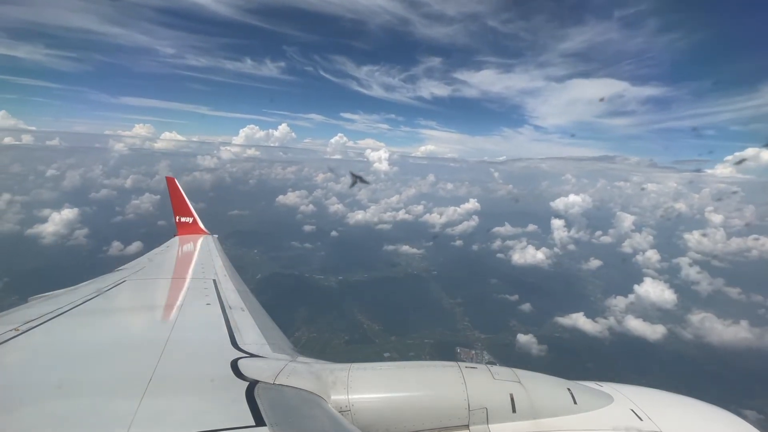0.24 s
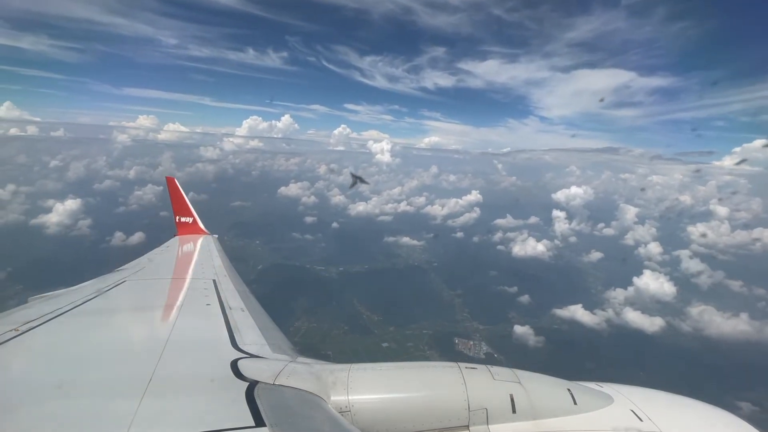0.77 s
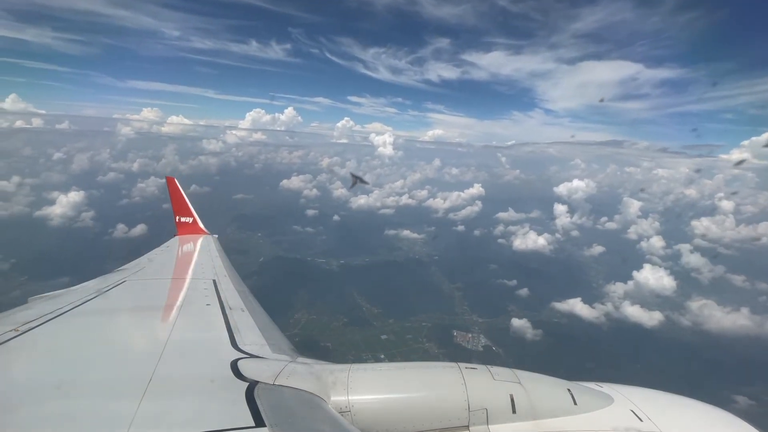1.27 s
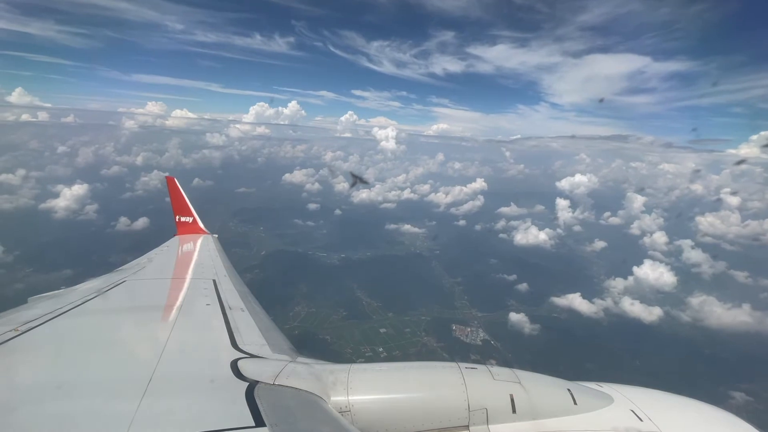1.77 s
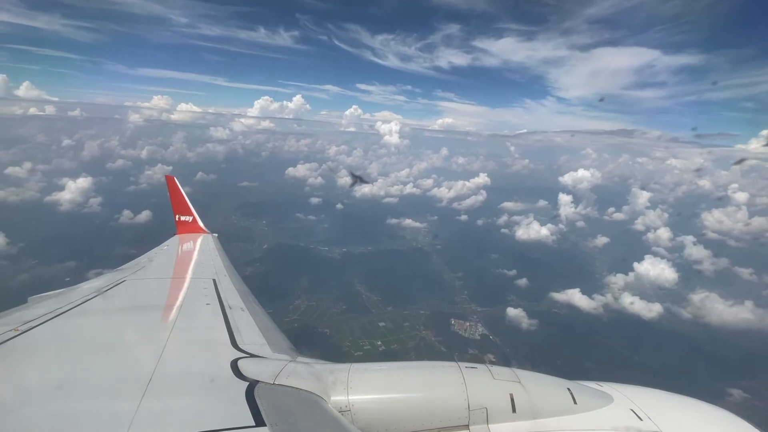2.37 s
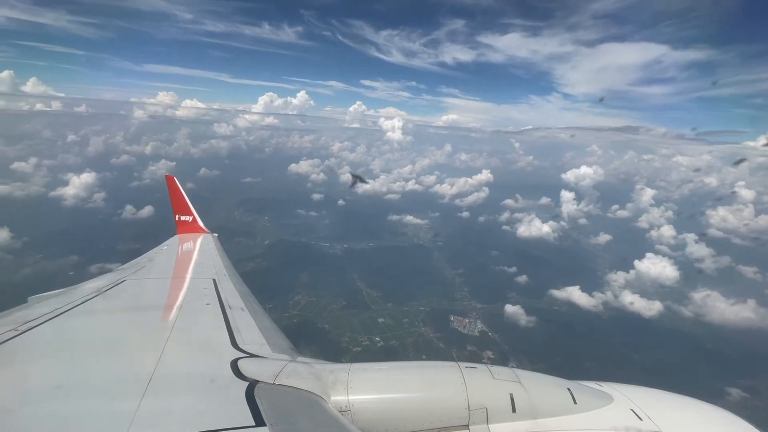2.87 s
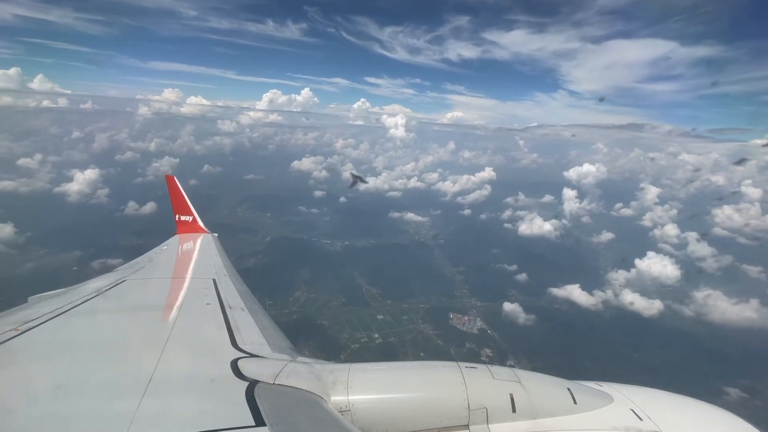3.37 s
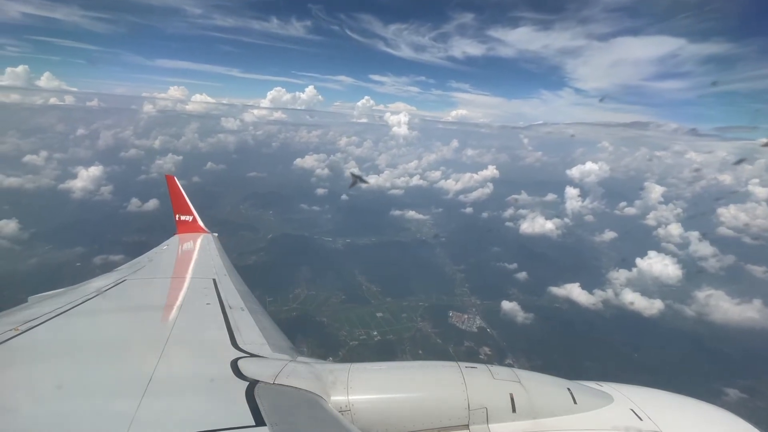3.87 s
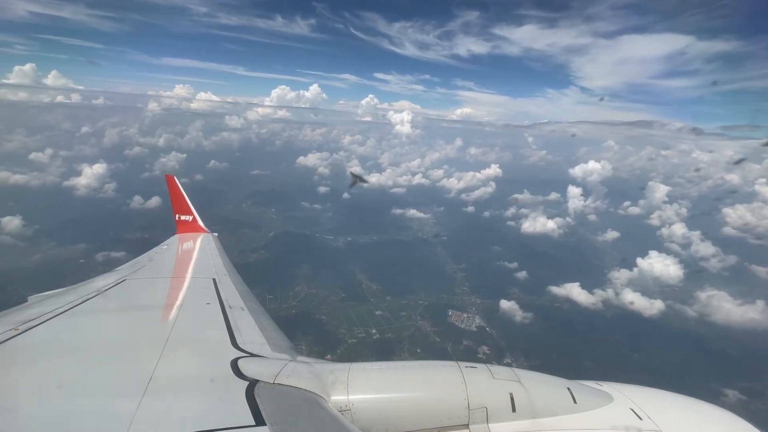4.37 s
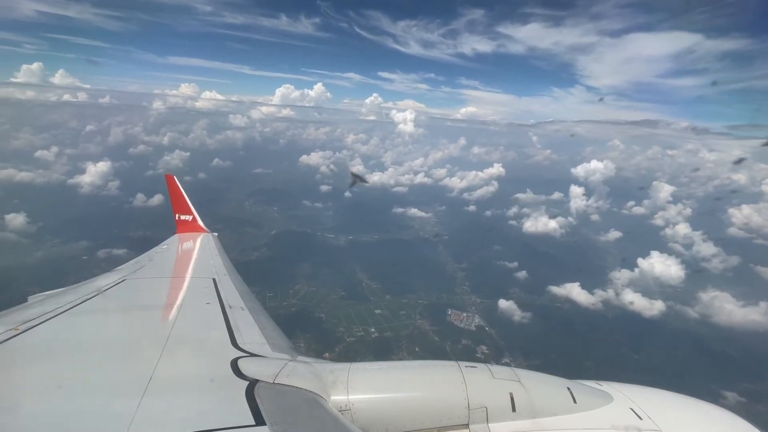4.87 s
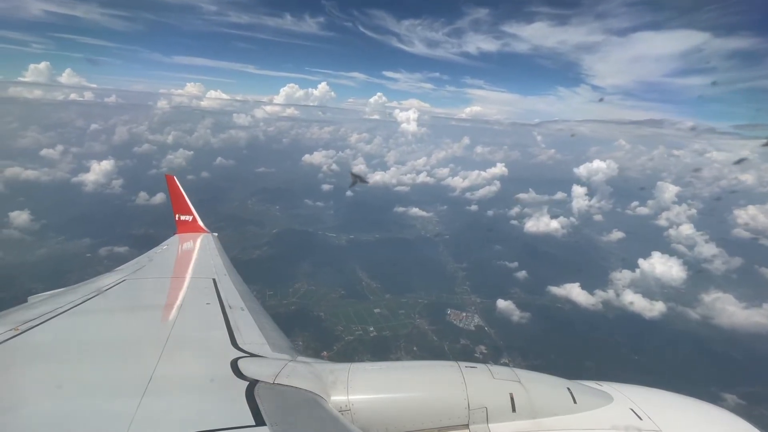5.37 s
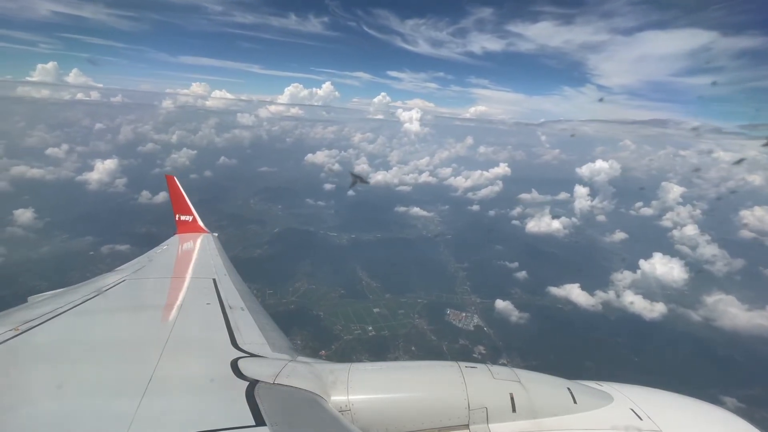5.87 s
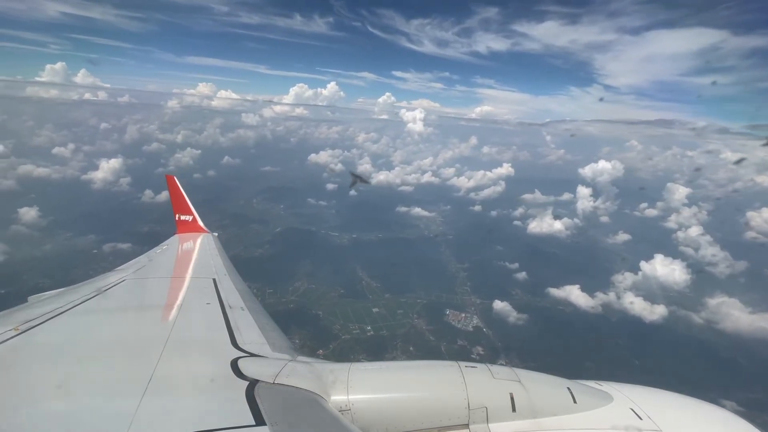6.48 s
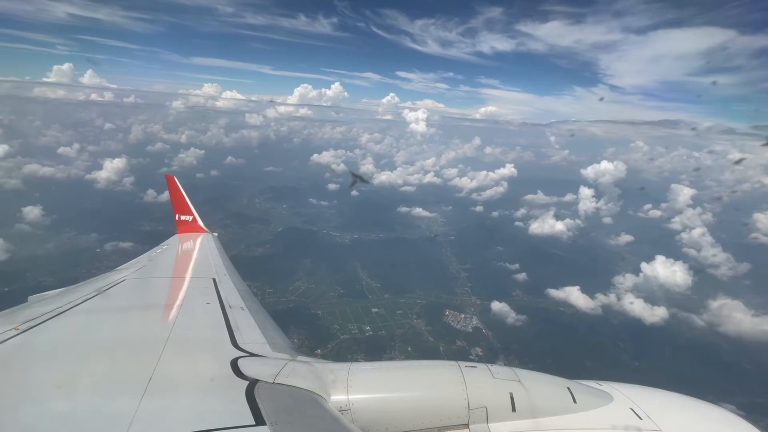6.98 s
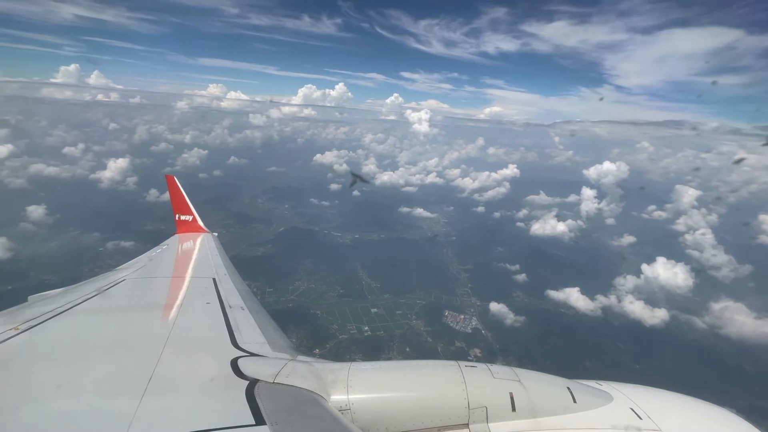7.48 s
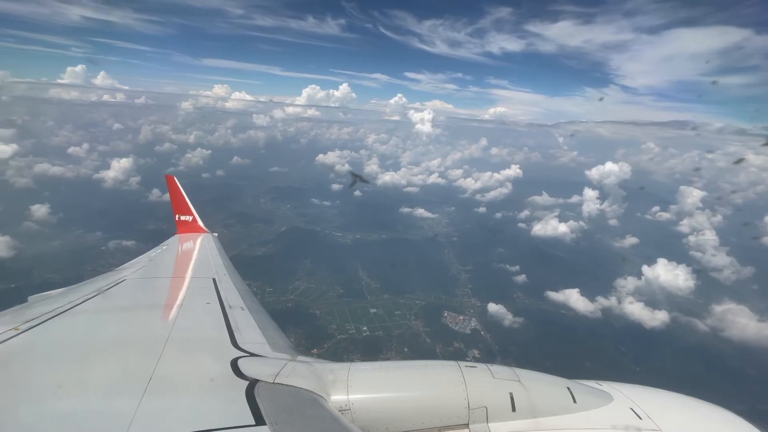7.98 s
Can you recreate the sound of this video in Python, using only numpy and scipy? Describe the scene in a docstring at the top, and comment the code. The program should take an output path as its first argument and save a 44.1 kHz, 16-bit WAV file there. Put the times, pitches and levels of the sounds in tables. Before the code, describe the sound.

From 0 to about 8 seconds, the uninterrupted interior noise of a jet airliner in cruise, heard at a window seat. A strong, deep hum near 80 Hz forms the base, joined by a thick, boomy roar concentrated around 100 to 300 Hz, as wall panels and cabin air resonate. Two close fan tones beat slowly: the hum is fuller at the start, thins around 3.9 seconds, then swells back towards the end. Above it, muffled rushing air extends through the mids with small, irregular turbulent flutters, falling away to a faint, dull hiss. A weak hydraulic pump whine near 550 Hz and its higher harmonics, plus very thin engine tones near 2 kHz, hover almost buried, nearly constant in pitch. Stereo is wide and enveloping, slightly different at each side, close and dense, with peaks gently held down. It begins and ends mid-drone, with no separate events.

```python
"""Window seat of an airliner in cruise: rushing air and jet roar shake the wall panels and the cabin air.
The roar is shaped noise, partly correlated left to right, whose patches above the bass swell and sink.
Two fan shafts and a core shaft hum through the airframe as sines, and the two fans beat.
A pump whines faintly in harmonics; the two-microphone recorder limits the peaks and the band."""
import sys
import numpy as np
from scipy import signal
from scipy.fft import irfft, next_fast_len
from scipy.io import wavfile
from scipy.ndimage import uniform_filter1d, minimum_filter1d

SR = 44100
rng = np.random.default_rng(int(sys.argv[2]) if len(sys.argv) > 2 else 0)


def dump_mix(stems):
    """Bounce the given channels to the path in sys.argv[1] as a 16-bit WAV at rate SR."""
    frames = np.atleast_2d(stems).T  # one column per channel
    limited = np.clip(frames, -1, 1)  # hard clip at full scale
    pcm = np.round(limited * 32767).astype(np.int16)
    wavfile.write(sys.argv[1], SR, pcm)


N = 363365

# broad roar and hiss through the wall: f/Hz, left density/dB per Hz, right density/dB per Hz
WALL_ROAR = [(25, -80.5, -76.5), (48, -48.4, -47.6), (70, -45.6, -40.6), (95, -37.2, -38.6),
             (118, -44, -43), (200, -56.7, -52.9), (420, -53.6, -52.9), (650, -51.2, -57.4),
             (1300, -78.5, -68.8), (2400, -86.3, -75.8), (3500, -80.3, -90.7), (3870, -83, -94),
             (4300, -82.3, -96), (4620, -84.5, -95), (5200, -85, -95.5), (5420, -87.5, -96),
             (5900, -88.8, -103.4), (7000, -87.9, -100.1), (8000, -88.1, -94.7), (9000, -92.4, -93.0),
             (9700, -91.1, -90.3), (11000, -97.0, -97.4), (12200, -104.3, -104.1)]


def gain_of(db):
    """Amplitude ratio of a level in dB."""
    return 10 ** (np.asarray(db) / 20)


def column(rows, at, log=False):
    """Joins table rows by straight lines, over log frequency if asked; one output row per column."""
    x, *columns = np.transpose(rows)
    if log:
        x, at = np.log(x), np.log(at + 1)  # +1 Hz keeps 0 Hz finite
    return np.array([np.interp(at, x, c) for c in columns])


def wander(rate_hz):
    """Slow random curve of rms 1: sines from 0.2 Hz to rate_hz, weaker as they quicken."""
    t_s = np.arange(0, N + 256, 256) / SR
    hz = np.geomspace(.2, rate_hz, num=24)
    sines = np.sin(2 * np.pi * (hz * t_s[:, None] + rng.random(len(hz))))
    slow = (sines / np.sqrt(hz)).sum(axis=1)
    return np.interp(np.arange(N) / SR, t_s, slow / slow.std())


def tone(hz, left_db, right_db, left_lead_rad, waver_db, start_turn=None):
    """A sine at both microphones whose level wavers with the turbulent path."""
    if start_turn is None:
        start_turn = rng.random()
    phase_rad = 2 * np.pi * (np.cumsum(hz * np.ones(N)) / SR + start_turn)
    level = gain_of(waver_db * wander(rate_hz=8.2))
    left = gain_of(left_db) * np.sin(phase_rad + left_lead_rad)
    right = gain_of(right_db) * np.sin(phase_rad)
    return np.sqrt(2) * level * np.array([left, right])  # table levels are rms


def airflow():
    """Noise whose power and left-right relation add up from the broad roar and each resonance."""
    # chosen left-right correlation of the broad roar and top hiss: f/Hz, correlation (-1..1)
    roar_correlation = [(25, 0.3), (50, 1.0), (90, 0.58), (200, 1.0), (400, -0.06), (900, -0.06),
                        (2000, 0.85), (4500, -0.09), (6000, -0.36), (8000, 0.29), (9000, -0.18),
                        (9900, -0.8), (10900, -0.8), (11400, 0.7)]
    # resonances of panels, window and cabin air:
    # f/Hz, width/Hz, left density/dB per Hz, right density/dB per Hz, left lead/rad
    modes = [(110, 13, -36.7, -32.9, -0.5), (126, 13, -35.6, -30.5, 1.0), (136, 15, -26.2, -33.5, 0.2),
             (158, 32, -31.5, -33, -0.4), (170, 93, -43.2, -37.7, 0.7), (221, 78, -39.3, -46.9, -0.6),
             (253, 23, -37.2, -39.9, 1.8), (296, 30, -42, -35.6, 1.2), (299, 133, -39.8, -49.0, 0.1),
             (307, 18, -38.5, -42, 0.9), (372, 33, -45.6, -45.2, -0.9), (484, 177, -56.0, -61.3, 2.8),
             (614, 51, -50.7, -54.6, -1.3), (656, 89, -55.7, -50.8, -0.2), (722, 55, -50.3, -62.3, -1.0),
             (799, 102, -43.5, -44.9, -3.0), (888, 289, -55.8, -57.4, 2.8), (959, 41, -54.4, -56.1, -2.9),
             (1031, 71, -53.9, -53.9, -3.1), (1070, 58, -51, -54.5, -0.7), (1122, 80, -56, -59.3, 0.7),
             (1285, 222, -60.9, -65.1, -2.8), (1372, 57, -65.3, -66.5, 2.3), (1476, 16, -63, -64, -0.8),
             (1480, 125, -61.8, -62, -1.1), (1540, 101, -63.6, -73.7, 1.5), (1638, 86, -64.0, -63.4, -2.7),
             (1772, 149, -68.3, -69.9, -2.4), (1848, 26, -66.5, -68.5, -0.5),
             (1915, 312, -68.6, -69.3, -0.3), (2041, 75, -68.5, -66.6, 2.4), (2130, 40, -69.3, -70.9, -1.9),
             (2214, 104, -68.7, -69.4, 2.0), (2256, 160, -70, -70, -0.7), (2275, 30, -70.5, -71, 0.2),
             (2502, 48, -65.8, -67.2, 1.8), (2580, 26, -66.9, -73.9, -2.7), (2689, 717, -73.7, -84.3, -3.0),
             (2716, 50, -71.5, -82, 1.0), (2788, 66, -74.7, -78.3, -2.5), (2865, 83, -71.2, -80.3, 1.0),
             (2942, 80, -81.0, -83.2, 0.5), (3085, 55, -72.0, -96.3, -1.5), (3242, 72, -74.0, -86.9, 0.6),
             (3298, 87, -77.3, -84.9, 2.6), (3360, 50, -80, -98, 0), (3490, 55, -71, -91, 0.4),
             (3639, 71, -75.9, -85.2, 0.2), (3760, 47, -73.6, -104.6, 0.1), (3960, 140, -83.5, -91, -1.6),
             (4026, 50, -81.5, -95, -0.4), (4125, 130, -79.5, -103, 1.0), (4263, 45, -80.5, -92, 2.8),
             (4370, 100, -81.5, -94, -1.2), (4440, 60, -84, -96, 1.1), (4510, 60, -84, -101, 2.2),
             (4725, 90, -81, -93.5, -2.4), (4825, 80, -83, -98, -3.0), (5000, 130, -85, -93, -1.7),
             (5240, 130, -85, -104, 0.5), (6550, 300, -87, -106, -0.6)]
    size, grid_hz = next_fast_len(N), np.arange(0, SR / 2, 2)
    left, right = gain_of(2 * column(WALL_ROAR, grid_hz, log=True))  # 2 * dB: power
    correlation = np.clip(column(roar_correlation, grid_hz, log=True)[0], -1, 1)
    cross = np.sqrt(left * right) * correlation + 0j
    for centre_hz, width_hz, left_db, right_db, lead_rad in list(map(tuple, modes)) + small_modes(count=16):
        shape = 1 / (1 + (2 * (grid_hz - centre_hz) / width_hz) ** 2) ** 2
        left = left + shape * gain_of(2 * left_db)
        right = right + shape * gain_of(2 * right_db)
        # one mode reaches both microphones coherently, with a fixed phase lead at the left
        cross = cross + shape * gain_of(left_db + right_db) * np.exp(1j * lead_rad)
    coherence = cross / np.sqrt(left * right)
    hz = np.fft.rfftfreq(size, 1 / SR)
    left, right, coherence = (np.interp(hz, grid_hz, v) for v in (left, right, coherence))
    a, b, c, d = rng.standard_normal((len(hz), 4)).T
    shared, apart = a + 1j * b, c + 1j * d
    to_left = coherence * shared + np.sqrt(np.clip(1 - abs(coherence) ** 2, 0, 1)) * apart
    spectra = np.array([np.sqrt(left) * to_left, np.sqrt(right) * shared])
    return irfft(spectra * np.sqrt(size * SR) / 2, size)[:, :N]


def small_modes(count):
    """Trim and fittings add a crowd of weak, narrow resonances scattered over the treble."""
    place, wide, left, right, lead = rng.random((count, 5)).T
    low_hz, high_hz = 5400, 7000
    hz = low_hz * (high_hz / low_hz) ** ((np.arange(count) + place) / count)
    left_db, right_db = column(WALL_ROAR, hz, log=True) - 5.0 + 7.0 * np.array([left, right])
    return list(zip(hz, 30 + 40 * wide, left_db, right_db, 2 * np.pi * lead))


def swell(roar):
    """Turbulence makes patches of the roar rise and fall a little, by the same dB at both microphones."""
    depth_rms_db, patch_hz, patch_s = 1.05, 300, .055
    steady_below_hz = 400  # full depth an octave higher
    frame, hop = 2048, 512
    hz, _, z = signal.stft(roar, SR, nperseg=frame, noverlap=frame - hop)
    depth_db = depth_rms_db * np.clip(hz / steady_below_hz - 1, 0, 1)[:, None]
    patches = rng.standard_normal(z.shape[1:][::-1]).T
    for axis, size in enumerate((patch_hz * frame / SR, patch_s * SR / hop)):
        cells = max(round(size), 1)
        for _ in range(2):
            patches = uniform_filter1d(patches, cells, axis)
    swollen = z * gain_of(depth_db * patches / patches.std())
    return signal.istft(swollen, nperseg=frame, noverlap=frame - hop)[1][:, :N]


def shafts():
    """Slight unbalance of fan and core shafts hums through the wing; blade tips add thin high orders."""
    # once-per-turn hum of each engine's fan: left level/dB, right level/dB, left lead/rad
    near_fan = (-16.5, -12, 0.99)
    far_fan = (-24.5, -23, .5)
    # higher orders of the near fan, by multiple: left level/dB, right level/dB, left lead/rad
    fan_orders = {3: (-38, -32.5, -1.7), 5: (-40, -43, .9), 13: (-48, -51, -1.3), 17: (-58, -62, -3.0),
                  19: (-58, -62, -.8), 20: (-62, -68, -2.0), 22: (-69, -65, -.8), 23: (-66, -65, -.4),
                  24: (-63, -80, .1), 25: (-62, -61, 0), 28: (-62, -68, .3), 29: (-65, -72, .2)}
    # blade tone of the far fan: multiple, left level/dB, right level/dB, left lead/rad
    far_blades = (24, -65, -61, -.7)
    # core shaft hum: left level/dB, right level/dB, left lead/rad
    core_hum = (-31.5, -32.5, -2.6)
    near_hz, creep_hz_per_s = 80.435, .021  # the near fan slowly gains speed
    far_hz, core_hz = 80.21, 236.9
    dip_s = 3.87  # the fan hums oppose here, exactly so at the right microphone
    start_turn = rng.random()
    hz = near_hz + creep_hz_per_s * np.arange(N) / SR
    gained_turns = (near_hz - far_hz) * dip_s + creep_hz_per_s * dip_s ** 2 / 2  # near ahead of far at the dip
    near = tone(hz, *near_fan, waver_db=0.84, start_turn=start_turn)
    far = tone(far_hz, *far_fan, waver_db=2.0, start_turn=start_turn + .5 + gained_turns)
    orders = sum(tone(k * hz, *row, waver_db=2.5) for k, row in fan_orders.items())
    multiple, *blade_row = far_blades
    blades = tone(multiple * far_hz, *blade_row, waver_db=2.0)
    core = tone(core_hz, *core_hum, waver_db=0.0)
    return near + far + orders + blades + core


def pump():
    """The piston pulses of a hydraulic pump give a thin harmonic whine that creeps up."""
    # harmonics, by multiple of the piston rate: left level/dB, right level/dB, left lead/rad
    harmonics = {1: (-38.5, -46, 3.1), 3: (-44.5, -43.5, -2.7), 4: (-53, -50.5, -.8), 5: (-62, -63, -3.0)}
    start_hz, creep_hz_per_s = 546.39, .08
    hz = start_hz + creep_hz_per_s * np.arange(N) / SR
    return sum(tone(k * hz, *row, waver_db=2.2) for k, row in harmonics.items())


def scene():
    """Swelling airflow roar, shaft hums and pump whine add up."""
    return swell(airflow()) + shafts() + pump()


def record(dry):
    """A quick look-ahead limiter holds each channel's peaks; then a low-pass sets the band limit."""
    knee, top = .8, .96  # peaks above the knee bend softly towards the top
    edge_hz, span, taps = 12250, 181, 511  # span and taps in samples
    ceiling = knee + (top - knee) * np.tanh(np.maximum(abs(dry) - knee, 0) / (top - knee))
    gain = minimum_filter1d(np.minimum(1, ceiling / (abs(dry) + 1e-9)), size=span)
    window = signal.windows.blackmanharris(span)[None]
    reduction = signal.oaconvolve(1 - gain, window / window.sum(), "same")
    held = dry * (1 - reduction)
    # mirrored ends let the sound run on past both edges
    held = np.pad(held, ((0, 0), (taps // 2, taps // 2)), "reflect", reflect_type="odd")
    low_pass = signal.firwin(taps, edge_hz, window=("kaiser", 9), fs=SR)
    return signal.oaconvolve(held, low_pass[None], "valid", axes=1)


dry = scene()
out = record(dry)
dump_mix(out)
```